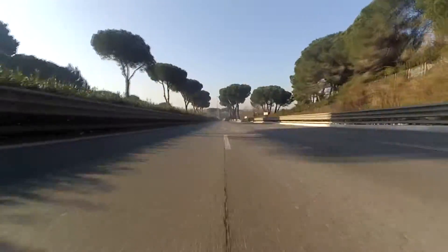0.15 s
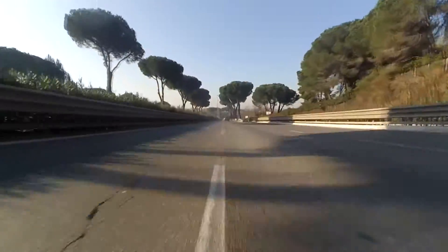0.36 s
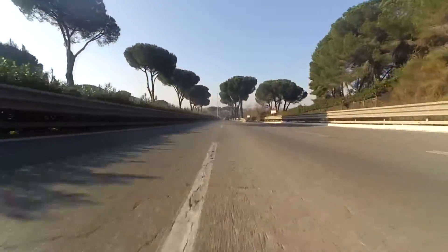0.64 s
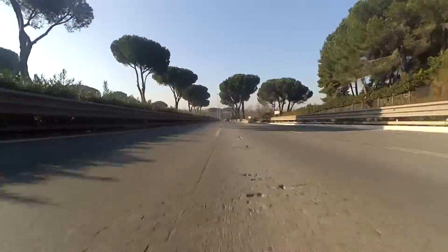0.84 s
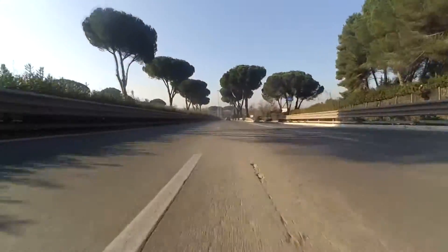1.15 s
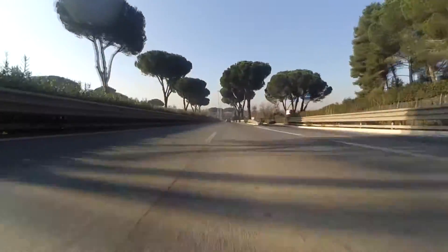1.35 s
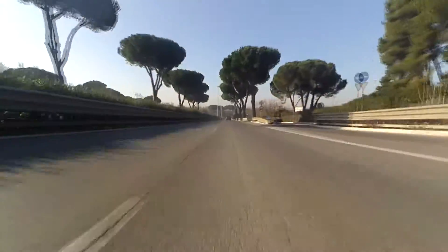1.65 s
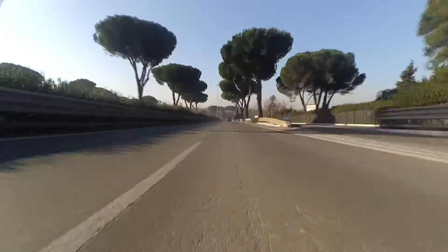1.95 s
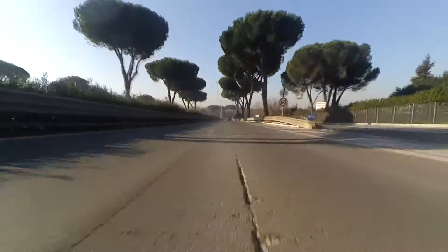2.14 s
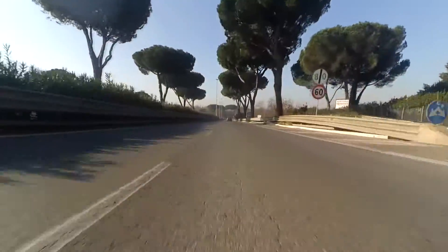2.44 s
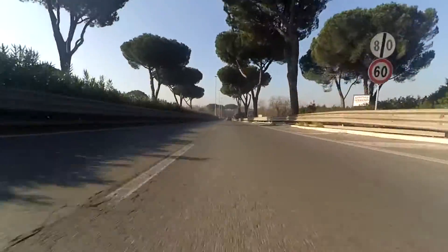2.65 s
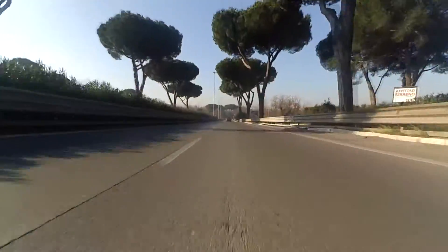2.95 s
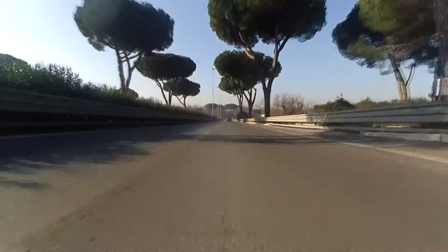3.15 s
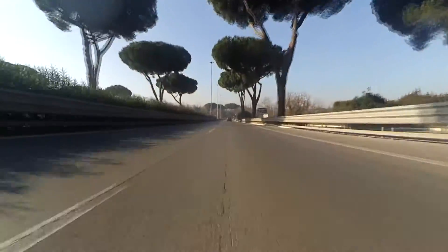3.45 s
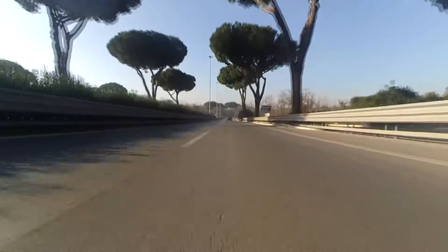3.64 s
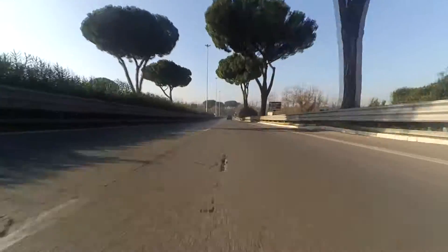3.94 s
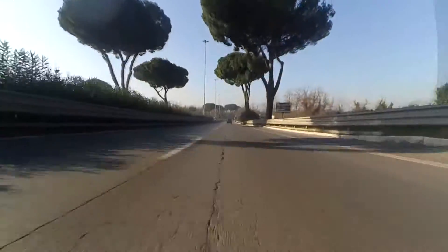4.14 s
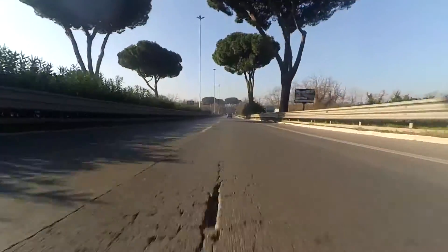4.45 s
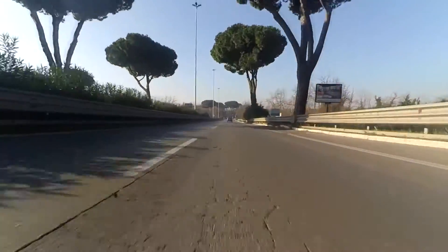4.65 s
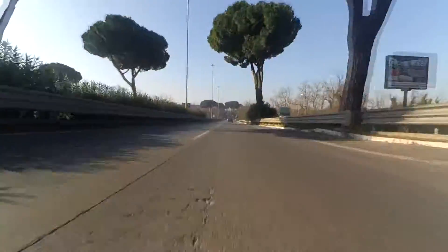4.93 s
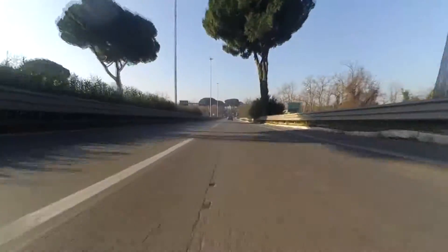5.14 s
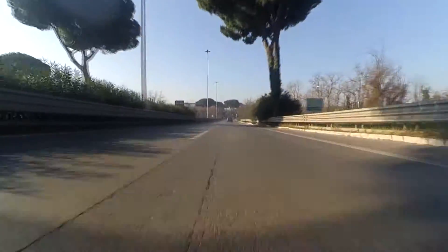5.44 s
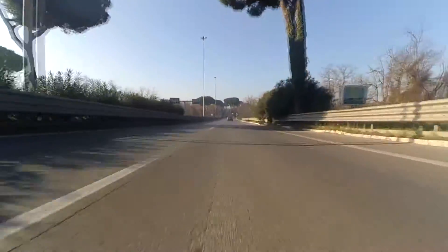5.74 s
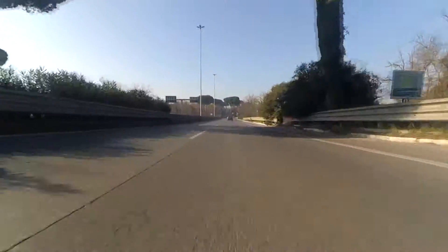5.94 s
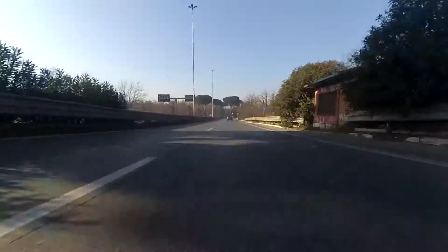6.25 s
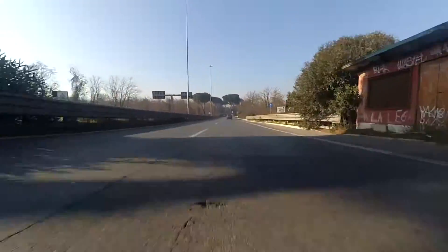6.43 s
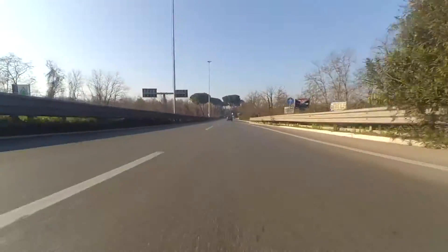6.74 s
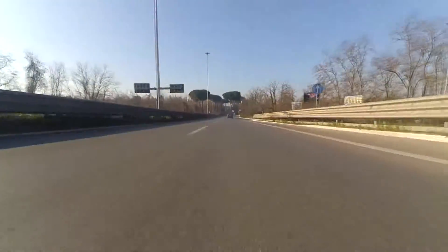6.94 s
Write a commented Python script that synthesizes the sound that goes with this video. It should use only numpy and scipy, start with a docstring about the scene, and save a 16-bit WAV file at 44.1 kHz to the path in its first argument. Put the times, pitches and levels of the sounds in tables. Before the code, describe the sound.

Heavy wind buffeting and steady tyre roar from low on a moving small car, with engine drone sinking slightly, dull thumps and ticks of grit.

```python
"""On a main road, a small air-cooled two-cylinder car slowly loses revs, heard from low on its body.
Filtered noise makes the wind's buffets, the low body boom, the tyre roar and the rasp; tones locked to one
shaft make throb, drone, hum and whine; struck modes make low thumps and the tick of grit; an edge whistles.
As the revs sink, the drone slides into a resonance, and then the whine swells once.
The strongest buffets overload the input and choke everything else for a few milliseconds."""
import sys
import numpy as np
from scipy import signal
from scipy.fft import rfft, irfft
from scipy.io import wavfile
from scipy.ndimage import uniform_filter1d

SR = 44100
rng = np.random.default_rng(int(sys.argv[2]) if len(sys.argv) > 2 else 0)


def persist_wave(psi):
    """Save psi, clipped to +-1, as 16-bit WAV."""
    counts = np.round(np.clip(psi, -1, 1) * 32767).astype(np.int16)
    wavfile.write(sys.argv[1], SR, np.atleast_2d(counts).T)


N = 312651
TIME = np.arange(N) / SR
FREQS = np.fft.rfftfreq(N, 1 / SR)

# Spectrum of the road hiss. Each row: frequency in Hz, relative level in dB.
HISS_SPECTRUM = [(700, -4.5), (1600, 3.5), (2700, 1.5), (3300, 3.5), (4000, 3.5), (4750, 4), (5100, -7.5),
                 (5600, -7), (6200, -12), (8000, -13), (9000, -20.5), (12000, -23), (15000, -31)]
# Peaks and hollows of the space between body and road. Each row: centre in Hz, width in Hz, height in dB.
UNDERBODY = [(385, 64, 6), (442, 28, 4.5), (544.5, 11, 8), (613.6, 22, 7), (675, 55, -9.5), (748, 36, 6),
             (800, 47, -11.5), (910, 38, 2.5), (1157, 8.9, -1), (1477, 30, -20), (1563, 17, 4),
             (1674, 200, 4), (1765, 73, -5.5), (1965, 230, 5), (2027, 56, -17.5), (2238, 61, 5),
             (2762, 158, 7.5), (3260, 190, -6.5)]
# Low thumps, some of them as hard buffets overload the input. Each row: time in seconds, peak level in dB.
LOW_THUMPS = [(0.625, -22), (0.77, -10), (0.859, -25), (0.979, -14.5), (2.029, -28), (2.215, -12),
              (2.555, -20), (4.157, -26.5), (4.579, -28), (5.071, -20.5), (6.583, -30)]


def undb(db):
    """Decibels to gain."""
    return 10 ** (np.asarray(db) / 20)


def unit(x):
    """Scale to rms 1."""
    return x / np.sqrt(np.mean(x ** 2))


def curves(table):
    """Draw each column of a table as a line over time; the first column is seconds."""
    s, *columns = np.transpose(table)
    return [np.interp(TIME, s, column) for column in columns]


def noise():
    """White noise."""
    return rng.standard_normal(N)


def walk(rate):
    """Smooth random drift of rms 1, made of noise below about rate in Hz."""
    return unit(irfft(rfft(noise()) * np.exp(-(FREQS / rate) ** 2), N))


def arch(s, length):
    """A swell that rises from nothing at s and is gone after its length, both in seconds."""
    return np.sin(np.pi * np.clip((TIME - s) / length, 0, 1))


def colour(x, points, peaks=()):
    """Filter by a (Hz, dB) spectrum with bell-shaped peaks and hollows; rms 1."""
    hz, db = np.transpose(points)
    shape = np.interp(np.log(FREQS + 1), np.log(hz), db)
    for centre, width, height in peaks:
        shape = shape + height * np.exp(-2 * ((FREQS - centre) / width) ** 2)
    return unit(irfft(rfft(x) * undb(shape), N))


def shaft(turns, orders, waver_db, slip, rate):
    """Tones locked to a turning shaft, each wavering in level (dB) and phase (slip in radians)."""
    out = 0
    for multiple, db in orders:
        phase = 2 * np.pi * (multiple * turns + rng.random()) + slip * walk(rate)
        level = undb(db + waver_db * walk(rate))
        out = out + np.sqrt(2) * np.sin(phase) * level
    return out


def resonance(crank_hz, centre, width, peak_db, off_db):
    """Gain of a part that rings near one crank speed: a peak of half-width in Hz on top of a floor."""
    return undb(off_db) + undb(peak_db) / (1 + ((crank_hz - centre) / width) ** 2)


def knocks(events, modes, crack, contact_s):
    """Each blow rings the modes at its own pitch, with a crack; longer contact rounds and dulls it."""
    t = TIME[:SR // 8]
    out = np.zeros(N + len(t))
    keep = np.exp(-1 / (contact_s * SR))
    scrape = colour(noise(), HISS_SPECTRUM)  # the crack takes the same path to the microphone as the hiss
    for s, db, pitch in events:
        start = int(s * SR)
        ring = 0
        for multiple, mode_db, t60 in modes:
            ring = ring + undb(mode_db - 60 * t / t60) * np.sin(2 * np.pi * pitch * multiple * t)
        burst = np.roll(scrape, -start)[:len(t)] * np.exp(-t / 0.0016)
        hit = signal.lfilter([1], [1, -keep], ring + crack * burst)
        out[start:start + len(t)] += hit / np.abs(hit).max() * undb(db)
    return out[:N]


def scatter(per_s, db, spread_db, hz_range):
    """Blows at random times, as rows of time in seconds, peak in dB, pitch in Hz."""
    rows = []
    for when, size, place in rng.random((round(per_s * N / SR), 3)):
        pitch = np.interp(place, [0, 1], hz_range)
        rows.append((when * N / SR, db + spread_db * (2 * size - 1), pitch))
    return rows


def buffeting():
    """Level of the air stream in dB: wind sags in lumps; each hard gust rises out of it, holds, falls back."""
    # Air stream between gusts. Each row: time in seconds, buffeting in dB before the sags.
    breeze_line = [(0.0, -17), (0.2, -12.5), (0.35, -16.5), (0.42, -14), (0.7, -15), (1.2, -14),
                   (1.31, -20), (1.45, -13.5), (1.6, -18), (1.75, -14), (1.95, -14), (2.01, -17.5),
                   (2.1, -15.5), (2.32, -15.5), (2.4, -21), (2.48, -18), (2.86, -16.5), (2.96, -19),
                   (3.12, -16.5), (3.2, -25.5), (3.28, -15.5), (3.52, -16.5), (3.76, -19), (3.93, -18),
                   (4.02, -18.5), (4.14, -15), (4.36, -16.5), (4.41, -20), (4.48, -19.5), (5.1, -14.5),
                   (5.18, -21), (5.3, -16), (5.58, -16), (5.68, -20.5), (5.85, -15.5), (5.92, -14),
                   (6.06, -22.5), (6.23, -19.5), (6.34, -28), (6.44, -16.5), (6.52, -24), (6.6, -17.5),
                   (6.88, -16), (7.09, -22.5)]
    # Hard gusts. Each row: start in seconds, hold in seconds, buffeting in dB.
    hard_gusts = [(0.052, 0.018, -11), (0.406, 0.023, -12), (0.498, 0.032, -12.5), (.618, 0.051, -10),
                  (0.763, 0.054, -10.5), (0.857, 0.054, -9), (0.965, 0.07, -9.5), (1.122, 0.018, -11),
                  (1.249, 0.019, -13), (1.691, .015, -12), (1.946, 0.018, -10.5), (2.077, 0.012, -11.5),
                  (2.2, 0.088, -12), (2.527, 0.046, -10), (2.67, 0.014, -11.5), (2.838, 0.012, -12.5),
                  (3.431, .02, -11.5), (3.672, 0.011, -12), (4.181, 0.012, -12), (4.481, 0.021, -12.5),
                  (4.575, 0.076, -10.5), (4.691, 0.012, -13), (4.844, 0.038, -12), (5.102, 0.016, -11),
                  (5.341, .015, -13), (5.952, 0.013, -12), (6.584, 0.017, -11), (6.679, 0.011, -10.8),
                  (6.793, 0.01, -12.5)]
    lump_db, lumps_hz, gust_edge_s = 1, 14, .016
    breeze = undb(curves(breeze_line)[0] - lump_db * np.maximum(walk(lumps_hz), 0))
    gusts = []
    for s, hold, db in hard_gusts:
        distance_s = TIME - np.clip(TIME, s, s + hold)
        gusts.append(undb(db) * np.exp(-(distance_s / gust_edge_s) ** 2))
    return 20 * np.log10(np.maximum(breeze, np.max(gusts, axis=0)))


def wind(buffet_db, throb):
    """Eddies and wheel throb shove the microphone without a break; low body boom and flutter swell less."""
    # Spectrum of the large eddies. Each row: frequency in Hz, relative level in dB.
    large_eddies = [(5, -19), (12, -18), (24, -40), (31, -20.5), (37, 2.5), (48, -6.5), (58, -8.5),
                    (66, -10.5), (76, -14), (100, -17), (140, -50), (200, -62), (400, -89)]
    # Spectrum of the engine and road boom, with wind flutter above.
    # Each row: frequency in Hz, relative level in dB.
    boom_and_flutter = [(60, -42), (85, 10), (110, 7.5), (145, -0.5), (175, 0), (205, -13), (230, -4.5),
                        (255, -12), (295, -5.5), (345, -20), (700, -30), (2000, -69)]
    # What the housing passes of the rumble. Each row: frequency in Hz, relative gain in dB.
    housing = [(8, -14), (17, 4.5), (22, -12), (27, -4), (34, -0.5), (68, -0.5), (78, -6), (100, -6),
               (200, -12), (400, -41), (3000, -120)]
    boom_db, boom_follow = -27.5, 0.32  # boom and flutter follow only a share of the swell, in dB
    shove = colour(noise(), large_eddies) + throb
    for _ in range(2):  # even out the strength over 25 ms, twice
        power = np.abs(signal.hilbert(shove)) ** 2
        shove = shove / np.sqrt(uniform_filter1d(power, size=1100))
    rumble = colour(shove, housing) * undb(buffet_db)
    boom = colour(noise(), boom_and_flutter) * undb(boom_follow * buffet_db + boom_db)
    return rumble + boom


def wheels(turns, crank_hz):
    """Out-of-round tyres shake the body; near top speed it bounces on its springs at twice wheel speed."""
    # Throb of the tyres. Each row: multiple of wheel speed,
    # level in dB against the large eddies before bounce and evening out.
    tyre_orders = [(1, -15), (2, -3.5), (3, -2.5), (4, -5), (5, -21.5), (6, -17.5), (7, -20.5), (8, -22.5)]
    wheel_turns = turns * .2235  # wheel turns per crank turn
    bounce = resonance(crank_hz, centre=76.6, width=1.1, peak_db=3, off_db=0)
    throb = 0
    for multiple, db in tyre_orders:
        tone = shaft(wheel_turns, [(multiple, db)], waver_db=1.5, slip=.25, rate=1.5)
        throb = throb + tone * (bounce if multiple == 2 else 1)
    return throb


def engine(turns, crank_hz):
    """One firing a crank turn: exhaust drone, rasp of gas, hum of the block, whine of the driven parts."""
    # Exhaust drone. Each row: multiple of crank speed, level in dB before the resonance.
    drone_orders = [(1, -35), (2, -37)]
    # Hum of engine block and fan. Each row: multiple of crank speed, level in dB at 72 Hz crank speed.
    hum_orders = [(3, -52.5), (3.67, -54.5), (4, -54)]
    # Whine of fan, dynamo and gears. Each row: multiple of crank speed, relative level in dB.
    whine_orders = [(9.15, 6), (10, 1), (10.98, 2), (13.4, 8)]
    drone = shaft(turns, drone_orders, waver_db=1.5, slip=.25, rate=4)
    drone = drone * resonance(crank_hz, centre=70.03, width=3.8, peak_db=-1.5, off_db=-8)

    shake_db = .6 * (crank_hz - 72)  # unbalanced parts shake harder at speed: dB per Hz of crank speed
    hum = shaft(turns, hum_orders, waver_db=2.5, slip=.5, rate=3) * undb(shake_db)

    whine = unit(shaft(turns, whine_orders, waver_db=2.5, slip=.9, rate=8))
    whine = whine * (undb(-50) + undb(-45) * arch(5.92, .56))  # steady floor plus one swell

    firing = turns.astype(int)
    strength = undb(3 * rng.standard_normal(firing[-1] + 1))[firing]  # no two firings are equally strong
    puffs = noise() * strength * np.exp(-(turns % 1) / 0.11)  # each dies away within a share of a turn
    rasp_spectrum = [(300, -2.5), (1000, 14.5), (1500, -22.0), (4500, -2.5), (9000, -34.0)]  # Hz, dB
    rasp = undb(-46.0) * colour(puffs, rasp_spectrum, UNDERBODY)
    return drone + hum + whine + rasp


def tyres():
    """Casings and tread blocks drum on uneven asphalt; tiny stones and air pockets crackle in the hiss."""
    # Road surface. Each row: time in seconds, then low roar, tread roar and hiss in dB before the trims.
    surface = [(0.0, 1, -37, -38), (0.28, 4.5, -35, -37.5), (.48, -1, -36.5, -36.5), (.7, -0.5, -35, -37),
               (.92, 2, -36, -39), (1.1, 5, -33, -37.5), (1.3, -1.5, -36.5, -40.5), (1.85, -3, -36, -39),
               (2.0, 4.5, -35.5, -38.5), (2.15, 2, -36, -38.5), (2.6, -4.5, -37.5, -39.5),
               (2.82, 3.5, -35.5, -41), (3.02, -4, -38, -42.5), (3.25, -2.5, -39, -40),
               (4.05, -2.5, -37.5, -42), (4.19, -1, -37, -42), (4.6, -2, -37.5, -40.5),
               (5.15, 0, -36.5, -42), (5.3, 0, -38, -41.5), (5.85, -1, -36, -42), (6.15, -0.5, -36, -42),
               (6.44, 0.5, -36, -43), (6.78, -2.5, -38, -41), (7.09, 1.5, -35, -43.5)]
    # Spectrum of the casings' low roar. Each row: frequency in Hz, relative level in dB.
    casing_spectrum = [(120, -68), (280, -12.5), (350, -11), (450, -0.5), (700, 3.5), (800, -2.5),
                       (1000, -11), (2000, -53)]
    # Spectrum of the tread roar. Each row: frequency in Hz, relative level in dB.
    tread_spectrum = [(400, -49), (700, -17.5), (850, -2.5), (930, 0.5), (1080, 4.5), (1250, -2.5),
                      (1450, -12.5), (2000, -16), (3000, -14), (6000, -91)]
    # Sandy patches that make the hiss flare. Each row: start in seconds, length in seconds, dB added.
    sand = [(0.08, 0.071, 1), (1.563, 0.073, 3.5), (1.884, 0.077, 1.5), (2.013, 0.07, 2.5),
            (2.272, 0.066, 0.5), (2.644, 0.032, 3), (3.163, 0.047, 2.5), (4.045, 0.064, 3.5),
            (4.13, 0.12, 1), (5.652, 0.14, 3), (6.89, 0.066, 4)]
    low_trim_db, roar_trim_db, hiss_trim_db = -42.5, 1.5, -2.16
    crackle_per_s, crackle_db = 1500, -5  # average grain rate; level against the smooth hiss
    low_db, roar_db, hiss_db = curves(surface)
    texture_db = .75 * walk(53)  # coarse and smooth patches of asphalt swell all the tyre noise

    low = colour(noise() * undb(texture_db + 1.1 * walk(37)), casing_spectrum, UNDERBODY)
    roar = colour(noise() * undb(texture_db + 0.87 * walk(110)), tread_spectrum, UNDERBODY)

    grain_db = 5.3 * np.minimum(rng.exponential(size=N), 4)
    grains = noise() * (rng.random(N) < crackle_per_s / SR) * undb(grain_db)
    fizz = noise() + undb(crackle_db) * unit(grains)
    hiss = colour(fizz * undb(texture_db + .6 * walk(24)), HISS_SPECTRUM, UNDERBODY)
    sand_db = sum(db * arch(s, length) for s, length, db in sand)

    low = low * undb(low_db + low_trim_db)
    roar = roar * undb(roar_db + roar_trim_db)
    return low + roar + hiss * undb(hiss_db + sand_db + hiss_trim_db)


def thump_swell():
    """Level of the low noise around the thumps: a quick rise before each and a slower fall after it."""
    rise_s, fall_s = 0.014, 0.077
    swell = 0
    for s, db in LOW_THUMPS:
        swell = swell + undb(db) * np.exp(-np.maximum((s - TIME) / rise_s, (TIME - s) / fall_s))
    return swell


def thumps(swell):
    """Each low thump rings the same damped modes, inside a short swell of low noise."""
    # Ring of a thump. Each row: frequency in Hz, relative level in dB, t60 in seconds.
    thump_modes = [(130, 8, 0.083), (173.5, 22, 0.11), (227, 2, 0.14), (324, -14, 0.16)]
    # Spectrum of the noise around a thump. Each row: frequency in Hz, relative level in dB.
    thump_noise = [(50, -29), (100, -6), (170, 28), (240, -8), (330, -12), (600, -49)]
    blows = [(s, db, 1) for s, db in LOW_THUMPS]  # pitch 1: the modes are already in Hz
    ring = knocks(blows, thump_modes, crack=0, contact_s=0.011)
    return ring + colour(noise(), thump_noise) * swell * undb(-19)


def grit():
    """Stones flicked by the tyres tick on a panel: listed large ones and a random scatter of fine ones."""
    # Larger stones on the underside. Each row: time in seconds, peak in dB, pitch of the struck spot in Hz.
    stones = [(.138, -25, 2830), (.659, -27, 2810), (.924, -27, 2790), (1.5807, -29, 4400),
              (2.0218, -20, 2660), (2.031, -26, 2250), (2.213, -28, 4150), (2.5501, -23, 2800),
              (2.554, -26, 2750), (2.576, -27, 2300), (2.6324, -29, 4600), (2.6793, -26, 2410),
              (4.2433, -26, 2810), (4.2504, -30, 4200), (4.543, -29, 4450), (4.6653, -22.5, 2780),
              (4.6675, -26.5, 3950), (4.8514, -29, 2710), (6.5545, -30, 4400), (6.6672, -27, 2840)]
    # Ring of the panel. Each row: multiple of the spot's pitch, relative level in dB, t60 in seconds.
    panel = [(.67, -18, .02), (.89, -10, .022), (1, 0, .04), (1.045, -7, .028), (1.38, -21, .025)]
    fine = scatter(per_s=2.4, db=-33, spread_db=2.5, hz_range=(2330, 4830))
    return knocks(stones + fine, panel, crack=.17, contact_s=.00007)


def whistle():
    """A thin tone where the air stream splits on an edge; it wavers, flickers, and swells in spells."""
    # Spells of whistling. Each row: start in seconds, length in seconds, level in dB before the flicker.
    whistle_spells = [(-.2, 0.6, -63), (.85, 0.35, -63), (1.6, .6, -68), (2.25, .3, -65), (2.68, .27, -62),
                      (5.21, .11, -62), (5.48, 0.54, -65), (5.97, .12, -62)]
    swell = sum(undb(db) * arch(s, length) for s, length, db in whistle_spells)
    hz = 7530 + 75 * walk(200)
    tone = np.sin(2 * np.pi * np.cumsum(hz) / SR)
    flicker = undb(2.5 * walk(45))
    return tone * (swell + undb(-84)) * flicker  # a trace stays between the spells


def scene():
    """Engine and wheels turn together in one gear, under the buffeting of the wind."""
    # Engine speed. Each row: time in seconds, crankshaft speed in Hz.
    crank_speed = [(0.0, 77.1), (1.5, 75.22), (2.5, 73.6), (5.0, 70.14), (7.09, 67.33)]
    crank_hz, = curves(crank_speed)
    turns = np.cumsum(crank_hz) / SR
    air = wind(buffeting(), wheels(turns, crank_hz)) + whistle()
    low_thumps = thumps(thump_swell())
    return (air + tyres() + low_thumps + engine(turns, crank_hz) + grit())[None]


def record(dry):
    """The input clips with a narrow knee, the sound fades in over its first few milliseconds, the converter
    adds faint hiss, the top is cut."""
    ceiling, knee, fade_s, top_hz = .325, 24, .004, 14900
    clipped = dry / (1 + np.abs(dry / ceiling) ** knee) ** (1 / knee)
    opened = clipped * np.minimum(TIME / fade_s, 1)
    hissing = opened + undb(-73) * noise()
    top_cut = signal.ellip(10, .1, 80, top_hz, fs=SR, output="sos")
    return signal.sosfilt(top_cut, hissing)


dry = scene()
out = record(dry)
persist_wave(out)
```